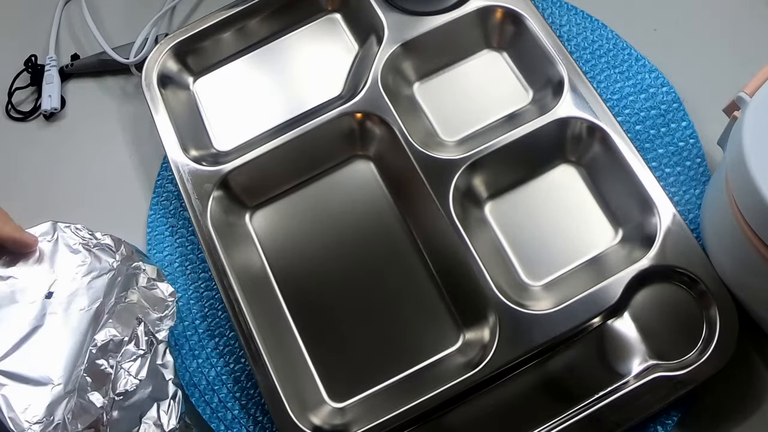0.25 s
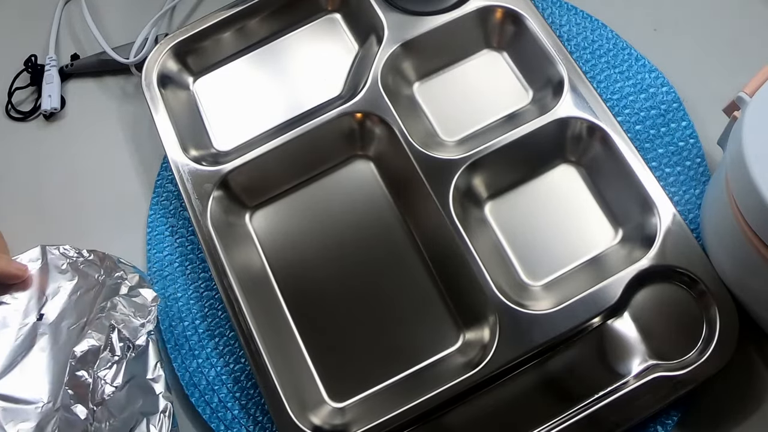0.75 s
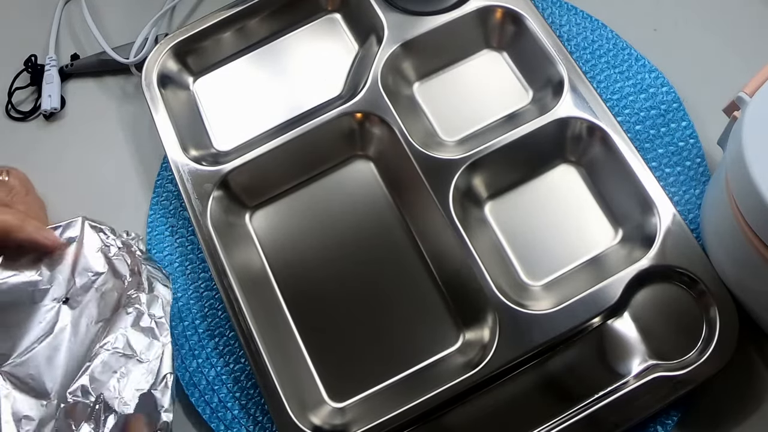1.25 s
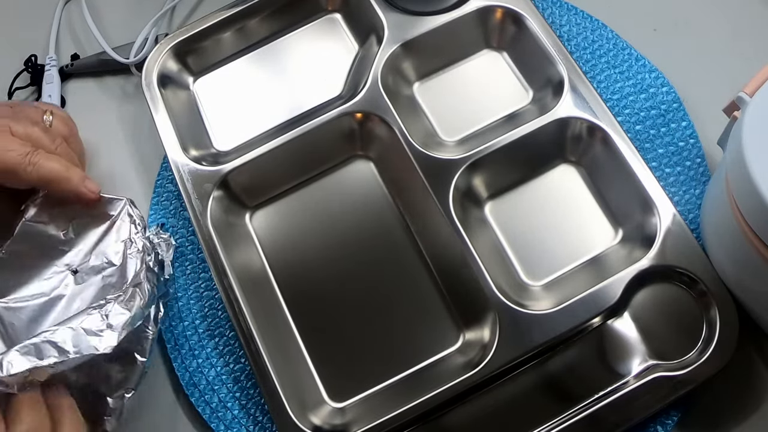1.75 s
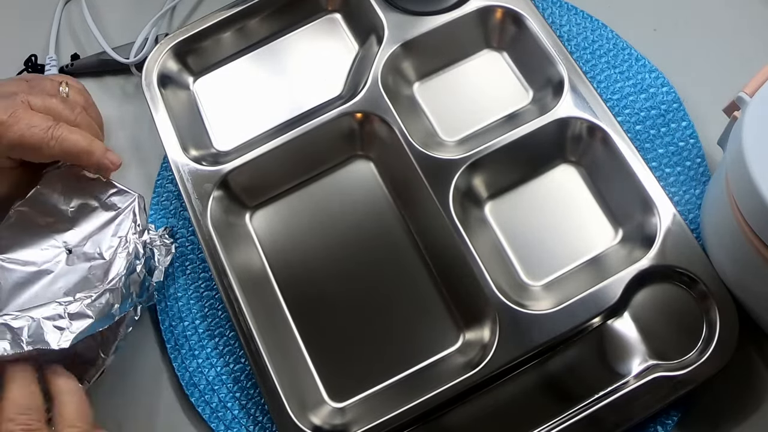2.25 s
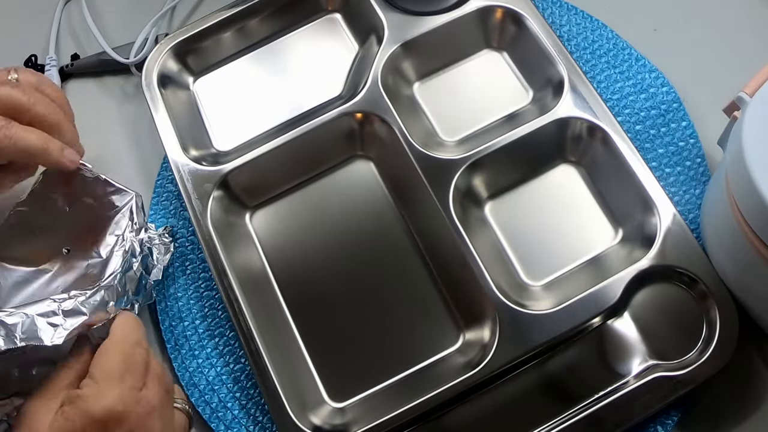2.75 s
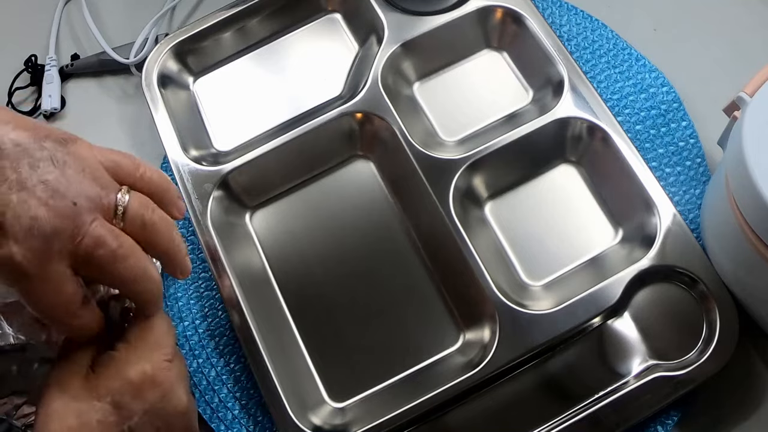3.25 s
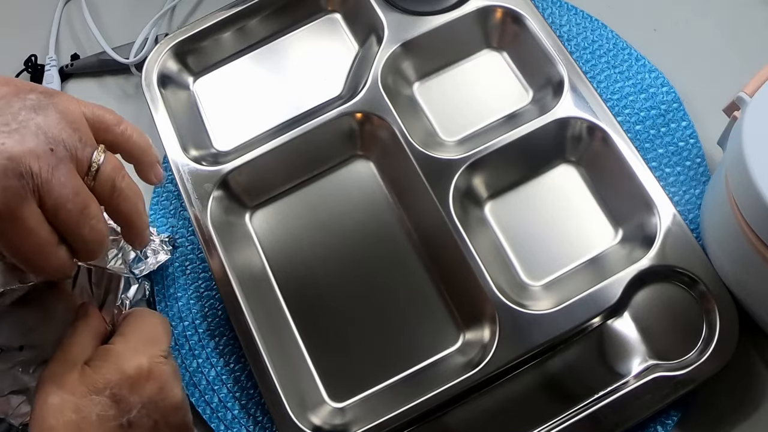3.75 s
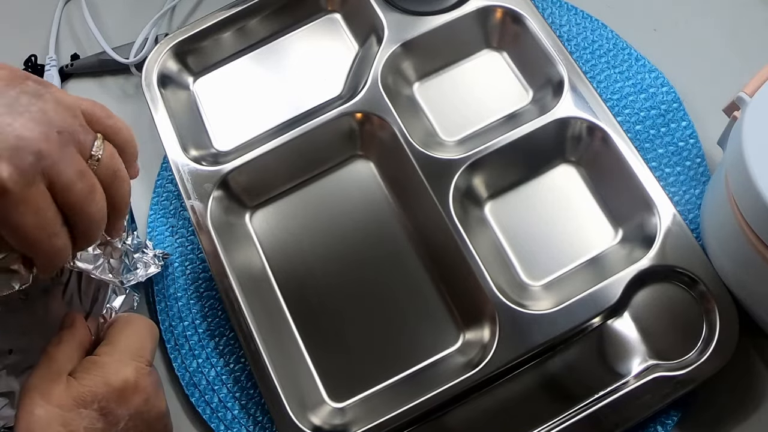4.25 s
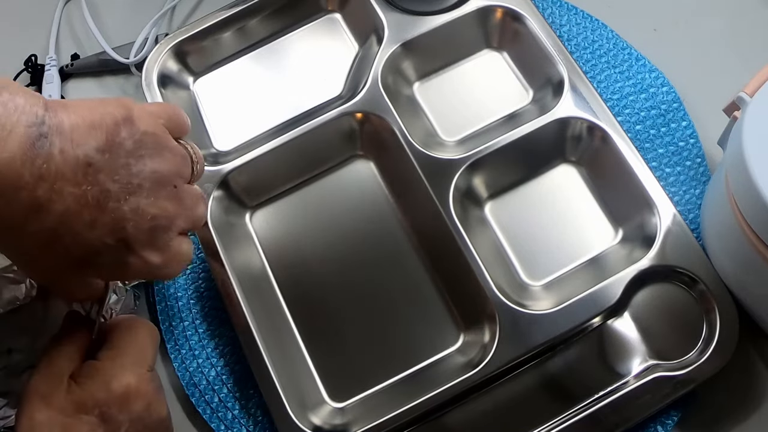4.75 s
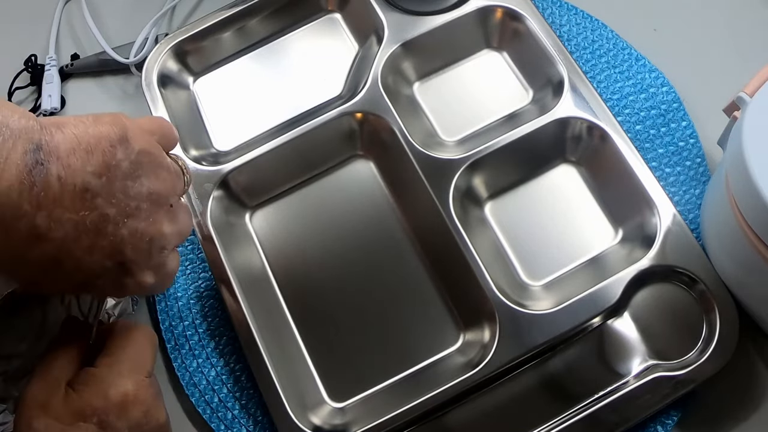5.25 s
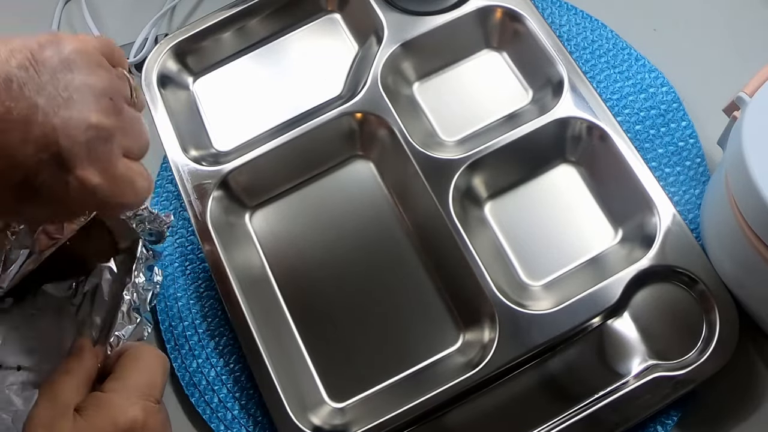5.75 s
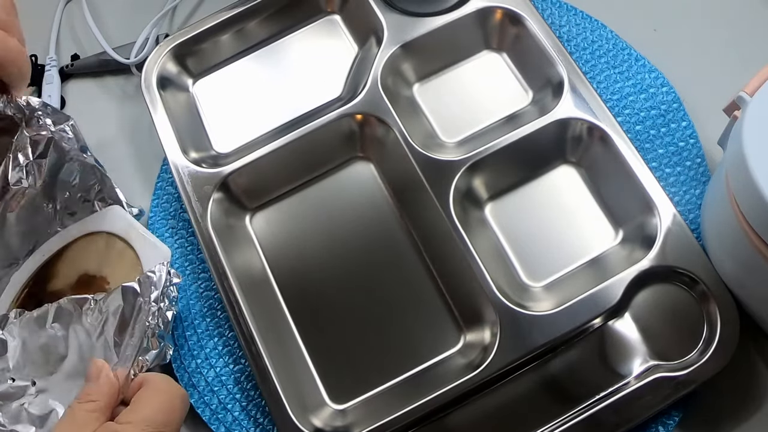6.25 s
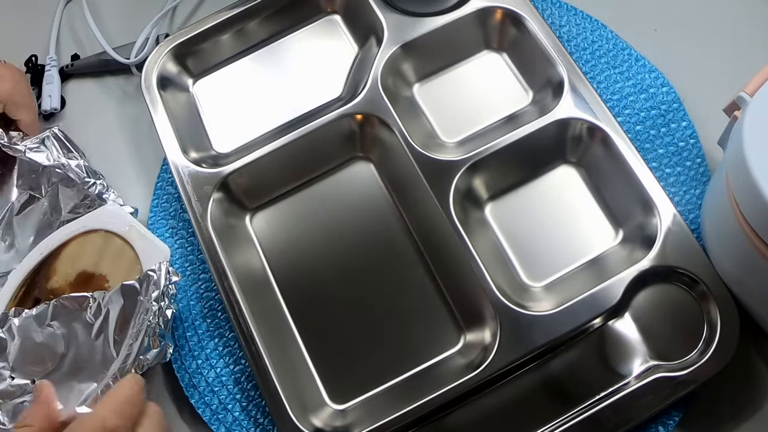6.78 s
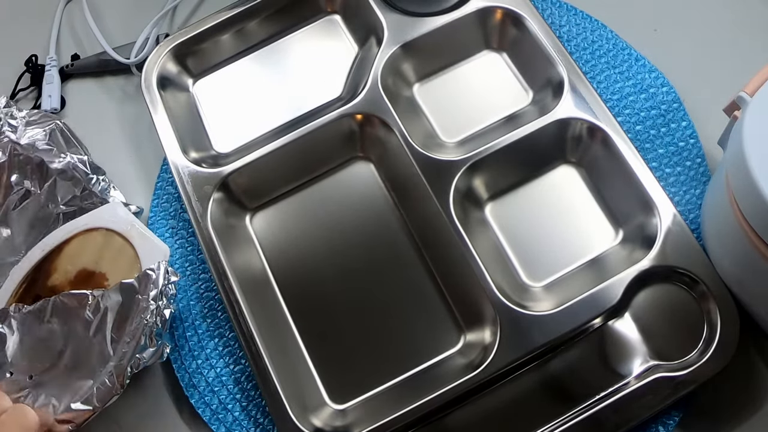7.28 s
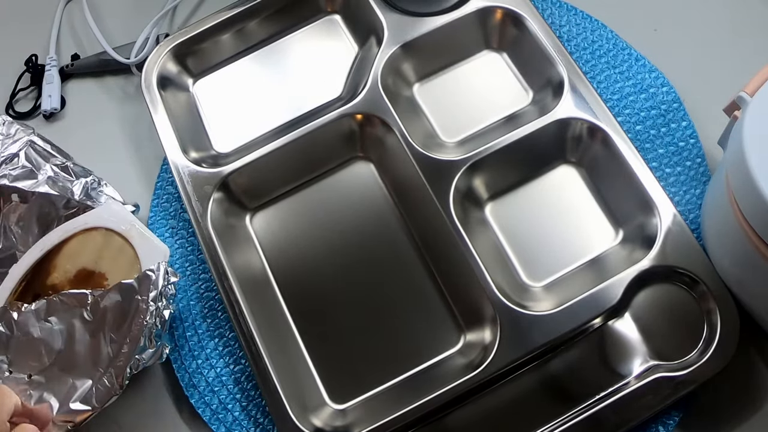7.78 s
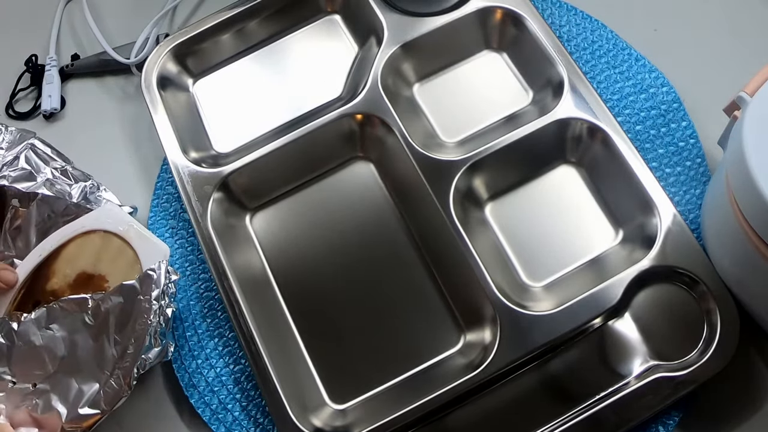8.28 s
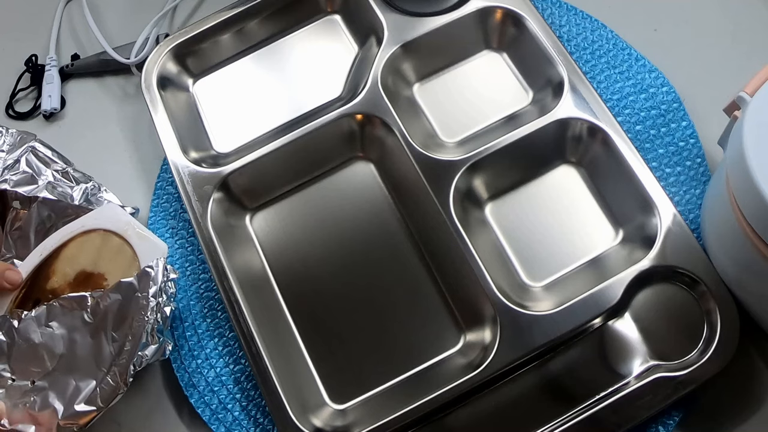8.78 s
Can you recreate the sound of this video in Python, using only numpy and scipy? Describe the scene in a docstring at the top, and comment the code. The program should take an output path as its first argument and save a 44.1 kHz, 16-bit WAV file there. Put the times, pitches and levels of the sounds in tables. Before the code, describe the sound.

Aluminium foil crinkles and crackles close up as it is peeled from a plastic tray, with sharp snaps, small squeaks and dull table knocks.

```python
"""Two hands peel aluminium foil off a plastic food tray on a table, close to a camera on a stand in a small room.
From the start noise-burst crinkle runs under single creases that crack and ring; squeaks and scrapes soon join in.
After 1 s the tray knocks on the table, heard as ringing table modes; near 2.7 s the hands almost let go.
The foil is worked hard again from 3.5 s, with the hardest snaps, knocks and stand sway around 5.8 to 6 s.
Lighter peeling follows to the end at 9 s; decaying-noise room sound, air and a faint hum lie under it all."""
import sys
import numpy as np
from scipy import signal
from scipy.fft import rfft, irfft, next_fast_len
from scipy.io import wavfile
from scipy.ndimage import uniform_filter1d, map_coordinates

SR = 44100
rng = np.random.default_rng(int(sys.argv[2]) if len(sys.argv) > 2 else 0)


def transcribe(signal):
    """Save signal, clipped to [-1, 1], as a 16-bit WAV file at the path in sys.argv[1]."""
    frames = np.atleast_2d(signal).T
    limited = np.clip(frames, -1, 1)
    pcm = np.round(limited * 32767).astype(np.int16)
    wavfile.write(sys.argv[1], SR, pcm)


N = 397782

# Table levels are relative: the function of each source may shift them all together.
# big creases that buckle: start_s, level_db, body_db (re level), treble_db (re level), facet_pitch_hz, t60_s
CREASE_SNAPS = [(.045, -31, -21, -8, 4950, 0.03), (0.076, -33, -23, -5, 2900, 0.15),
                (.144, -26, -13, -8, 2360, 0.06), (.158, -28, -18, 0, 1140, 0.067),
                (0.2226, -37, -14, -3, 1890, 0.028), (.259, -39, -9, -2, 2400, .025),
                (0.405, -40.5, -8, -2, 1280, 0.08), (.434, -35.5, -15, -0.5, 2450, 0.19),
                (.472, -37.5, -20, 0, 1280, 0.039), (0.523, -42.5, -14, 11, 4990, 0.022),
                (.538, -31, -15, -1, 1900, 0.13), (0.574, -32, -11, 6.5, 1330, 0.069),
                (0.6607, -40, -12, 3.5, 1800, 0.049), (.679, -42, -19, 11, 6650, 0.1),
                (0.697, -36, -26, -2.5, 1330, .03), (0.749, -31, -28, -4.5, 2920, 0.067),
                (0.774, -25, -21, -8, 1900, 0.17), (0.928, -37, -30, -3, 2280, 0.027),
                (0.951, -47.5, -20, 14.5, 8000, 0.045), (1.012, -38.5, -12, -4, 2900, 0.029),
                (1.027, -33, -14, 1, 2960, 0.038), (1.06, -23, -5, -0.5, 2280, 0.095),
                (1.091, -27, -14, 1, 3000, .03), (1.118, -23.5, -18, -3, 2600, 0.035),
                (1.144, -29, -16, -7, 3500, .022), (1.163, -31, -14, -5, 2800, .022),
                (1.183, -29, -13, -3, 2240, 0.055), (1.326, -34.5, -12, -15, 1160, 0.025),
                (1.379, -26.5, -20, -18, 1250, 0.043), (1.55, -31, -10, -6, 1230, 0.023),
                (1.562, -31, -16, -10, 1610, 0.029), (1.672, -29, -24, -9, 1290, 0.022),
                (1.714, -32, -21, -19, 1180, 0.12), (1.738, -23.5, -12, -14, 2430, 0.09),
                (1.757, -18.5, -19, -5, 4690, 0.032), (1.9064, -25.5, -6, -9, 2400, 0.035),
                (1.931, -26.5, -16, -12, 2250, .025), (1.954, -25.5, -20, -6, 2240, 0.035),
                (1.98, -29.5, -7.5, -5, 3840, 0.085), (2.001, -34, -12, 10.5, 2330, 0.08),
                (2.09, -31.5, -17, 6, 3810, 0.051), (2.128, -29, -18, 2, 2210, 0.067),
                (2.216, -29, -18, -6.5, 3320, 0.11), (2.259, -33, -20, -16, 2190, 0.025),
                (2.291, -34, -10, -1, 5000, .02), (2.332, -32, -13, -4, 4000, 0.04),
                (2.347, -33, 3.5, -14, 910, 0.03), (2.433, -40, -5, -11, 4600, 0.051),
                (2.463, -40, -6, -1, 5160, 0.061), (2.488, -41, -9, -8, 2790, 0.032),
                (2.538, -35.5, -11, -6.5, 4740, 0.078), (2.796, -39.5, -34, -15, 3500, 0.057),
                (2.814, -48, -24, -2.5, 2600, 0.091), (2.917, -42.5, -16, -1, 2500, 0.11),
                (2.953, -38.5, -4, -2.5, 2600, 0.13), (3.001, -27, -7, -3.5, 3980, 0.12),
                (3.015, -30, -10, -6, 2500, 0.072), (3.052, -31.5, -21, -6, 3420, 0.027),
                (3.111, -32, -4.5, -7, 1410, 0.058), (3.207, -37, -29, -1, 5700, 0.06),
                (3.2316, -46, -11, -2, 2940, 0.039), (3.3077, -33, -16, -6, 3640, 0.048),
                (3.374, -45, -9, 15, 6590, 0.05), (3.406, -34, -17, -2, 3600, .035),
                (3.413, -38, -16, 6, 1340, 0.027), (3.4405, -23.5, -32, -2.5, 5600, 0.025),
                (3.538, -32.5, -5.5, 0.5, 4360, 0.025), (3.558, -34.5, -13, -2, 1950, .05),
                (3.594, -33, -14, 0, 2500, 0.029), (3.613, -29, -14, -6, 1950, 0.11),
                (3.622, -27, -15, -12, 1940, .04), (3.683, -30, -12, -15, 1740, 0.027),
                (3.708, -26.5, -8, 1.5, 3000, 0.074), (3.744, -33, -15, -3, 1400, 0.027),
                (3.759, -33, -20, -6, 1720, 0.018), (3.778, -24, -12.5, -1, 3660, 0.067),
                (3.814, -28.5, -16, -3, 2370, .02), (3.823, -32.5, -18, -3, 3000, .018),
                (3.854, -31, -9, -4, 3770, 0.097), (3.869, -27.5, -19, -8, 2430, 0.045),
                (3.887, -37, -24, -1, 4440, .02), (3.942, -38, -24, 9, 3740, 0.013),
                (3.964, -24.5, -8, -0.5, 3500, 0.046), (3.969, -26.5, -9, 1, 3500, 0.04),
                (3.994, -38, -16, 5, 5000, .02), (4.0025, -24.5, -23, -4, 1940, 0.038),
                (4.02, -28, -12, 1, 5550, 0.027), (4.034, -28.5, -22, -6, 1820, 0.04),
                (4.052, -29, -29, 1.5, 3400, 0.025), (4.078, -36, -18, -2, 1400, 0.027),
                (4.137, -30.5, -1, -2, 1370, 0.032), (4.159, -34, -17, -1, 3600, .02),
                (4.182, -32, -19, 0, 8160, 0.022), (4.1911, -31.5, -14, 7, 3620, 0.028),
                (4.2031, -25.5, -21, -3, 3780, 0.039), (4.211, -22, -14, -8, 2400, 0.055),
                (4.241, -29, -13, -3, 4220, 0.043), (4.291, -31.5, -24, -18, 6500, 0.034),
                (4.379, -35.5, -18, -2, 1870, 0.042), (4.4104, -34.5, -29, -16, 3870, .03),
                (4.439, -30, -26, -24, 3800, 0.039), (4.496, -26.5, -14, -5, 4100, 0.08),
                (4.615, -31.5, -10, -2, 1270, 0.066), (4.658, -31.5, -10, -9, 4600, 0.099),
                (4.789, -32, -23, 0.5, 7000, 0.11), (4.806, -29, -33, -2, 1770, 0.11),
                (4.908, -42, -30, 7, 1370, 0.025), (4.948, -35, -23, -6.5, 1380, 0.11),
                (5.026, -36, -10.5, -2, 4390, 0.049), (5.0804, -28.5, -30, -2, 3400, 0.039),
                (5.103, -29.5, -20, -4, 2260, 0.06), (5.11, -30, -18, -3, 2390, 0.083),
                (5.187, -43, -20, -8, 3000, .02), (5.201, -34, -7, -7, 3000, 0.061),
                (5.21, -29.5, -10.5, -5, 4770, 0.058), (5.217, -33, -8.5, -1, 3500, 0.045),
                (5.244, -39, -14, -1, 2600, .025), (5.269, -39, -22, 4, 3530, .037),
                (5.3134, -30.5, -30, -1, 1490, 0.026), (5.321, -35, -30, 4, 4300, 0.029),
                (5.339, -39, -27, 15, 3880, 0.027), (5.3896, -24.5, -24, -6, 3400, 0.037),
                (5.44, -27, -18, -6.5, 1410, 0.034), (5.516, -24.5, -28, -4.5, 1390, 0.038),
                (5.549, -31, -26, -11, 1360, 0.076), (5.567, -30, -8.5, 0.5, 4900, 0.07),
                (5.599, -31.5, -13, -3, 2350, 0.022), (5.62, -35, -17, -4, 1340, .02),
                (5.635, -30, -22, -7, 1490, .02), (5.6455, -29, -25, 0, 3620, 0.018),
                (5.6603, -22.5, -32, 1, 1400, 0.044), (5.679, -27.5, -29, 4, 1370, 0.024),
                (5.687, -22, -19, 0.5, 1380, 0.095), (5.712, -28, -24, -7, 2400, .025),
                (5.755, -25.5, -9.5, -4, 1120, 0.035), (5.771, -28.5, -22, -3, 3570, .025),
                (5.798, -26, -13, -8, 2800, .08), (5.8126, -16.5, -25, -7, 3600, 0.022),
                (5.8213, -18.5, -8, -6.5, 2650, 0.053), (5.83, -23, -15, -2, 3000, .02),
                (5.8404, -20.5, -8, -2, 2400, 0.019), (5.8443, -17, -22, -7, 1340, 0.031),
                (5.851, -18, -7.5, -10, 2730, 0.035), (5.873, -25, -12, -7, 1400, .02),
                (5.879, -31, -12, -2, 2600, 0.023), (5.906, -32, -10, -7, 3600, 0.017),
                (5.94, -24, -10, -11, 2400, .018), (5.9469, -20.5, -6, -5, 2750, 0.034),
                (5.96, -18.5, -15, -7, 2280, 0.022), (5.9685, -24, -12, -6, 2550, 0.025),
                (5.977, -26, -14, -6, 2500, .02), (6.0064, -17, -8, -8, 2700, 0.037),
                (6.019, -29, -6, -5, 3470, 0.026), (6.068, -28, -26, -11, 885, 0.083),
                (6.136, -36.5, -16, -1, 3000, 0.017), (6.186, -33, -7, 1, 3550, 0.03),
                (6.209, -32, -26, -5, 3610, 0.022), (6.22, -34, -16, -2, 4220, 0.031),
                (6.252, -36, -11, -8, 3000, .025), (6.277, -33, -27, -2.5, 2920, 0.05),
                (6.288, -36, -20, 0, 4500, 0.032), (6.3014, -37, -21, -2, 1910, 0.035),
                (6.353, -26.5, -16, -9, 3320, 0.035), (6.388, -41, -18, 1, 5000, .025),
                (6.416, -38, -17, -13, 2710, .02), (6.431, -32, -7.5, -4, 2130, 0.098),
                (6.506, -38, -13, -14, 3020, 0.03), (6.516, -35.5, -12, -7, 4890, .025),
                (6.546, -43, -18, -8, 4500, 0.018), (6.573, -31.5, -8, -9, 3440, 0.04),
                (6.62, -31, -11, 0.5, 3680, 0.086), (6.651, -34.5, -16, -5, 1600, 0.025),
                (6.699, -38, -12, -13, 2490, 0.026), (6.715, -36, -22, -11, 2580, .025),
                (6.724, -31.5, -13, -6, 2900, 0.04), (6.735, -35, -16, -5, 2300, .02),
                (6.751, -42, -21, 12, 3850, 0.15), (6.823, -31, -7, -4, 5170, 0.084),
                (6.838, -27.5, -15, -0.5, 5160, 0.059), (6.866, -28, -13, -12, 2000, 0.062),
                (6.883, -22, -19, -11, 4940, 0.088), (7.069, -36, -15, -6, 5860, 0.094),
                (7.105, -39.5, -15, 4, 6480, 0.045), (7.162, -28, -13, -7, 5500, 0.08),
                (7.21, -30.5, -17, -17, 3480, 0.058), (7.24, -38, -22, 5, 4600, 0.033),
                (7.255, -32, -23, 4.5, 5630, 0.15), (7.3005, -24, -28, -5, 4370, 0.017),
                (7.39, -38.5, -30, -10.5, 2450, 0.018), (7.401, -39, -34, -10, 2140, 0.03),
                (7.493, -43.5, -15, 12.5, 5150, 0.066), (7.5847, -39, -9, -5, 2450, 0.028),
                (7.602, -39.5, -17, 7, 5840, 0.031), (7.67, -30.5, -17, -7, 1860, 0.039),
                (7.711, -26, -18, 1, 3360, 0.068), (7.753, -29, -5, 0, 1950, 0.029),
                (7.781, -27, -1.5, -1, 1830, 0.11), (7.8284, -33, -2.5, -5, 3740, .03),
                (7.845, -32, -17, -7, 1830, .025), (7.892, -26.5, -11.5, 4, 1850, 0.049),
                (7.938, -31, -10, -8, 3430, 0.091), (8.015, -21, -18, -3.5, 6800, 0.054),
                (8.079, -37.5, -15, -3, 3380, 0.055), (8.129, -38, -22, -20, 3530, 0.066),
                (8.18, -36, -26, -8, 3740, .025), (8.2, -33.5, -20, 1.5, 3270, 0.067),
                (8.238, -32, -31, -3, 3050, 0.067), (8.265, -40.5, -20, 7.5, 6400, 0.042),
                (8.35, -37.5, -26, 7, 2980, 0.058), (8.394, -30.5, -11, -1, 4080, 0.097),
                (8.426, -31.5, -5.5, -2, 1110, 0.12), (8.552, -25, -5.5, -5.5, 4470, 0.033),
                (8.559, -31.5, -12, -12, 1080, 0.037), (8.664, -35.5, -31, -0.5, 4840, 0.037),
                (8.675, -44, -25, 8, 5200, 0.065), (8.691, -32, -14, -13, 2180, 0.053),
                (8.733, -38, -23, -7, 3210, 0.026), (8.965, -35.5, -6.5, -10, 1280, 0.063),
                (8.981, -36, -10.5, -5, 6950, 0.12)]
# taut facets that pop through and ring on one pitch: start_s, peak_db, pitch_hz, t60_s
FACET_PINGS = [(0.9275, -23.5, 2354, 0.023), (2.816, -44, 1310, 0.031), (3.6167, -29, 1950, .05),
               (3.6837, -27, 1800, .02), (4.0035, -19, 1940, .02), (4.036, -28, 1880, .02),
               (4.053, -23, 1870, .018), (4.286, -34, 1880, .02), (5.516, -31, 1400, .02),
               (5.6885, -24, 1350, .03), (5.9487, -19, 2820, .012), (8.6926, -30, 2110, .016)]
# spectrum of the foil: frequency_hz, level_db (per Hz)
FOIL_SPECTRUM = [(120, -17.5), (250, -8), (400, -11.5), (560, -7), (1050, -3.5), (1320, 2), (1650, 1.5),
                 (2400, 3.5), (3500, 2), (6000, -0.5), (8800, -2.5), (10500, -13.5), (13000, -30.5),
                 (15000, -39)]
# how firmly the hands hold the foil: time_s, crinkle_db
HAND_GRIP = [(0, -47), (.38, -51.5), (1.3, -48), (2.35, -50.5), (2.6, -58.5), (2.755, -81), (2.785, -56),
             (2.9, -60), (3.29, -56), (3.5, -42), (4.6, -50), (5.4, -52), (6.2, -49.5), (7.02, -51),
             (7.5, -51), (8.3, -50), (8.78, -52), (9.02, -52.5)]
# fingers pull or press the foil: start_s, length_s, crinkle_db, body_db (re crinkle), treble_db (re crinkle)
FOIL_PULLS = [(0, 0.015, -42.5, -14, 2), (0.153, 0.083, -46, -5.5, -3), (0.304, 0.054, -44, -17, -28),
              (0.537, 0.078, -43.5, -6, -1), (0.727, 0.15, -40, -14, -5), (1.077, 0.071, -35, -20, -9),
              (1.177, 0.32, -41, -4, -11), (1.324, 0.14, -35.5, -7, -32), (1.484, 0.15, -39, -4, -16),
              (1.688, 0.2, -34, -10, -16), (1.906, 0.086, -31, -18.5, -12), (2.012, 0.25, -42, -5.5, -6),
              (2.297, 0.1, -46.5, -1.5, -23), (3.028, 0.1, -44.5, -5, -10), (3.408, 0.071, -50, -6, 1),
              (3.546, 0.099, -42, -15, -2.5), (3.658, 0.15, -43, -14, -9), (3.87, 0.048, -44.5, -11, -2.5),
              (3.986, 0.11, -47, -5, 4.5), (4.154, 0.083, -43, -6, -1), (4.447, 0.052, -40.5, -21, -5.5),
              (4.643, 0.051, -43.5, -19, -1.5), (5.117, 0.18, -53.5, -14, 1),
              (5.372, 0.13, -46.5, -32, -5.5), (5.544, 0.14, -41.5, -11, -8.5),
              (5.67, 0.18, -38.5, -12, -6), (5.823, 0.065, -32, -10, -6), (5.933, 0.051, -30.5, -6.5, -9),
              (6.027, 0.043, -41, 0.5, -1), (6.202, 0.17, -44, -9.5, -10), (6.724, 0.052, -48.5, -7, -11),
              (6.867, 0.049, -48, -3, -1), (7.21, 0.064, -45, -8, -2.5), (7.628, 0.019, -45, -26, 0.5),
              (7.696, 0.095, -38.5, -6, -2.5), (7.798, 0.13, -43, -8.5, -5), (8.017, 0.052, -47, -7, 2.5),
              (8.293, 0.18, -44, -10, -17), (8.57, 0.076, -51.5, -8.5, -17)]
# where the foil is worked: time_s, left_re_right_db
FOIL_PLACE = [(0.0, 1.5), (0.43, 3.5), (2.11, 0), (2.36, 3), (6.03, 1.5), (6.51, 4), (6.96, 1.5),
              (7.06, 6.5), (7.13, 2.5), (9.02, 3.5)]
# foil squeaking or the tray sliding on the table: start_s, length_s, pitch_hz, line_width_hz, level_db
SLIDES = [(0.285, 0.16, 1297, 50, -52.5), (0.47, 0.15, 1337, 55, -52), (0.577, 0.019, 1326, 60, -38.5),
          (1.299, 0.26, 1258, 71, -38.5), (1.331, 0.25, 685, 69.5, -49), (1.5, 0.21, 1217, 60, -46.5),
          (1.684, 0.051, 1245, 65, -38.5), (1.807, 0.23, 1340, 60, -49), (1.76, 0.32, 2330, 200, -44),
          (2.371, 0.03, 2650, 60, -42), (2.324, 0.025, 2910, 60, -42), (2.383, 0.086, 2820, 110, -51),
          (2.45, .09, 2900, 100, -54), (2.483, 0.3, 380, 80.4, -69), (2.874, 0.24, 242, 69, -61),
          (3.603, .03, 1934, 60, -42), (3.994, 0.099, 1890, 60, -52), (4.478, 0.057, 425, 70, -53.5),
          (4.58, 0.27, 438, 91, -67), (5.663, 0.085, 1363, 75, -38.5), (6.063, 0.025, 922, 50, -42.5),
          (7.714, 0.019, 3170, 280, -27.5)]
# hollow modes of the plastic tray: pitch_hz, level_db
TRAY_MODES = [(230, 2.5), (430, 6), (640, 14.5), (830, -20)]
# the tray knocks on the table: start_s, peak_db
TRAY_KNOCKS = [(1.058, -38), (1.112, -51), (2.334, -43), (4.137, -55), (4.608, -64), (5.231, -50),
               (5.849, -47), (5.94, -33), (6.006, -35), (7.675, -45), (7.704, -34.5), (8.967, -45.5)]
# modes of the table top: pitch_hz, level_db, t60_s
TABLE_MODES = [(60, 4.5, 0.048), (86, -0.5, 0.18), (121, 2, 0.15), (169.6, -4.5, 0.12), (255, -0.5, 0.085),
               (361, -17, 0.18), (492, -5, 0.038)]
# the hands push the tray about on the table: start_s, length_s, stand_sway_db, table_thud_db
TRAY_PUSHES = [(0.197, 0.08, -52.5, -55.5), (0.573, 0.35, -70, -67), (1.092, 0.057, -47, -35.5),
               (1.226, 0.15, -49.5, -45.5), (1.505, 0.21, -59, -55.5), (1.8, .48, -75, -61),
               (2.313, 0.025, -69, -54), (3.05, 0.087, -63, -60.5), (3.45, 0.21, -69, -72),
               (3.983, 0.042, -57, -54), (4.577, 0.073, -56.5, -57.5), (5.14, 0.16, -51, -62),
               (5.567, 0.064, -69, -61), (5.86, 0.073, -41, -43.5), (5.982, 0.11, -35.5, -40),
               (6.16, 0.12, -55, -60), (6.74, 0.21, -55.5, -55.5), (7.043, 0.11, -63, -56.5),
               (7.716, 0.11, -64, -44.5), (7.804, 0.27, -57, -64), (8.69, 0.024, -66, -55)]
# stereo width: frequency_hz, side_re_mid_db
STEREO_WIDTH = [(30, 10), (55, -3.5), (85, -4), (120, -3), (250, -6.5), (600, -5), (1280, -3), (2350, -6),
                (4330, -8), (8000, 1), (14700, 0.5)]
# decay of the room: frequency_hz, t60_s
ROOM_DECAY = [(150, 0.2), (1000, 0.3), (4000, 0.15), (8000, 0.21), (14000, 0.64)]
# spectrum of the room air: frequency_hz, level_db (per Hz)
AIR_SPECTRUM = [(40, 8), (120, -13), (400, -1), (700, -6), (3000, -5), (8000, -29), (14000, -55)]
# lines of the appliance hum: pitch_hz, line_width_hz, level_db
HUM_LINES = [(57.6, 1.3, -70), (176.2, 23.6, -68.5)]

GRIP_BODY_DB, GRIP_TREBLE_DB = -13.5, -7.5  # colour of the held foil, re its crinkle
PULL_RISE_S, PULL_RELEASE_DB_PER_S = 0.046, 307
PUSH_RISE_S, SWAY_RELEASE_DB_PER_S, THUD_RELEASE_DB_PER_S = 0.041, 129, 223
REST_SWAY_DB, REST_THUD_DB = -94, -74  # hands resting on the tray
# ring re crack: strongest at the reference pitch, weaker to either side
FACET_DB, FACET_REF_HZ, FACET_DB_PER_OCTAVE = -1, 1710, -2
TOP_HZ = 14800  # highest frequency kept


def snaps(level_db=3, facet_q=12, flip_s=0.0014, unzip_per_s=0.51, sharp=1.09, sharp_t60_s=0.015):
    """A crease flips: a sharp crack, then an uneven flutter runs through the sheet and its facet rings."""
    t = np.arange(4096) / SR
    hz = np.fft.rfftfreq(len(t), 1 / SR)
    bands, width = registers(hz), amp(along(STEREO_WIDTH, hz))
    out = np.zeros((2, N + len(t)))
    for start_s, db, body_db, treble_db, facet_hz, t60_s in list(CREASE_SNAPS) + small_snaps():
        patch = bands * ripple(hz, depth_db=4.0, spacing_hz=229.4)
        colours = np.vstack([patch, resonance(hz, facet_hz, facet_hz / facet_q)])
        mid, side = rfft(rng.standard_normal((2, len(colours), len(t)))) * colours

        crack = (1 - np.exp(-t / flip_s)) * amp(-60 * t / sharp_t60_s)
        # long creases take a moment to unzip
        unzip = 1 - np.exp(-t / (flip_s + unzip_per_s * t60_s ** 2))
        flutter = unzip * amp(-60 * t / t60_s) * spurts(len(t), depth_db=2.0, per_second=310)
        fade = (flutter + sharp * crack) / np.hypot(1, sharp)

        left_right = np.stack([mid + width * side, mid - width * side], axis=1)
        bursts = irfft(left_right) * fade
        fade_rms = np.sqrt(np.mean(fade ** 2))
        body, middle, treble, facet = (unit(burst) * fade_rms for burst in bursts)

        # the facet takes its share of the crack's energy
        octaves_off = abs(np.log2(facet_hz / FACET_REF_HZ))
        ring = amp(FACET_DB + FACET_DB_PER_OCTAVE * octaves_off)
        snap = (middle + ring * facet) / np.hypot(1, ring)
        snap = snap + amp(body_db) * body + amp(treble_db) * treble
        out[:, max(round(start_s * SR), 0):][:, :len(t)] += amp(db + level_db) * snap
    return out[:, :N]


def small_snaps(count=150, facet_hz=2800, facet_octaves=0.7):
    """Lesser creases give way at scattered times, following the crinkle gain; rows as in CREASE_SNAPS."""
    at = ((np.arange(count) + rng.random(count)) * N / count).astype(int)
    levels_db = 20 * np.log10(strain()[1][at])
    pitches_hz = facet_hz * 2 ** (facet_octaves * rng.standard_normal(count))
    # body -15 dB, treble -4 dB, t60 0.019 s
    return [(i / SR, db, -15, -4, pitch_hz, 0.019) for i, db, pitch_hz in zip(at, levels_db, pitches_hz)]


def pings(attack_s=0.00091, hold_s=0.0023, waver_hz=40):
    """A popped facet rings on a wavering pitch: it holds briefly, then dies away."""
    t = np.arange(SR // 12) / SR
    out = np.zeros((2, N))
    for start_s, db, pitch_hz, t60_s in FACET_PINGS:
        steps = rng.standard_normal((2, len(t)))
        drift = np.sqrt(2 * np.pi * waver_hz / SR) * np.cumsum(steps, axis=1)
        tone = np.sin(2 * np.pi * pitch_hz * t + drift) * (1 - np.exp(-t / attack_s))
        decay = amp(db - 60 * np.maximum(t - hold_s, 0) / t60_s)
        out[:, round(start_s * SR):][:, :len(t)] += decay * tone
    return out


def crinkle(body_db=-3.5, middle_db=-3.5, treble_db=-2.0, own_db=-2.5):
    """Hundreds of tiny creases give way each second, some in every register, others only in their own."""
    shared = ticks(per_second=300, spread_db=1.0, cap_db=9.0, life_s=0.0057)
    gains = np.array(strain()) * amp([[body_db], [middle_db], [treble_db]])
    out = np.zeros((2, N))
    for k, gain in enumerate(gains):
        own = ticks(per_second=260, spread_db=2.5, cap_db=7.5, life_s=0.00091)
        out += gain * stereo(shared + amp(own_db) * own, lambda hz: registers(hz)[k])
    return recrumple(out, depth_db=2.0)


def strain():
    """How hard the foil is worked, as gains of sheet body, crinkle and treble: the grip plus the pulls."""
    grip_db, = curves(HAND_GRIP)
    starts, lengths, crinkle_db, body_db, treble_db = np.transpose(FOIL_PULLS)
    gains = []
    for held_db, pulled_db in [(GRIP_BODY_DB, body_db), (0, 0), (GRIP_TREBLE_DB, treble_db)]:
        pulls = gestures(starts, lengths, crinkle_db + pulled_db, PULL_RISE_S, PULL_RELEASE_DB_PER_S)
        gains.append(np.hypot(amp(grip_db + held_db), pulls))
    return gains


def registers(hz, body_hz=900, treble_hz=4500):
    """The foil's colour split by frequency into sheet body, crinkle and treble."""
    low = 1 / (1 + (hz / body_hz) ** 6)
    high = 1 - 1 / (1 + (hz / treble_hz) ** 6)
    return amp(along(FOIL_SPECTRUM, hz)) * np.sqrt(np.abs([low, 1 - low - high, high]))


def ripple(hz, depth_db, spacing_hz):
    """Random peaks and dips: the modes of one crumpled patch of foil."""
    heights = rng.standard_normal(size=400)
    return amp(depth_db * map_coordinates(heights, [hz / spacing_hz], mode="wrap"))


def recrumple(x, depth_db):
    """The sheet keeps changing shape, so its resonances come and go."""
    z = signal.stft(x, nperseg=256)[2]
    field = uniform_filter1d(rng.standard_normal(z.shape[1:]), size=2, axis=0)  # across frequency
    field = uniform_filter1d(field, size=7, axis=1)  # across time
    return signal.istft(z * unit(amp(depth_db * unit(field))), nperseg=256)[1][:, :N]


def scrapes(slip_db=2.5, slips_per_s=75, grit_db=-9, grit_spread=3):
    """A sliding surface sticks and slips, squeaking in uneven, gritty spurts."""
    out = np.zeros((2, N))
    for start_s, length_s, pitch_hz, width_hz, db in SLIDES:
        n = round(length_s * SR)
        grit = stereo(rng.standard_normal((2, n)), lambda hz: resonance(hz, pitch_hz, grit_spread * width_hz))
        squeak = (wavering(n, pitch_hz, width_hz) + amp(grit_db) * grit) / np.hypot(1, amp(grit_db))
        envelope = spurts(n, slip_db, slips_per_s) * signal.windows.tukey(n, .5)
        out[:, round(start_s * SR):][:, :n] += amp(db) * squeak * envelope
    return out


def taps(count=70, level_db=-15, t60_s=0.063, attack_s=0.0022):
    """Fingers bump the hollow tray lightly at random, ringing its modes harder the firmer the grip."""
    t = np.arange(SR // 10) / SR
    grip_db, = curves(HAND_GRIP)
    out = np.zeros(N + len(t))
    for at in rng.integers(0, N, count):
        ring = np.zeros(len(t))
        for mode_hz, mode_db in TRAY_MODES:
            pitch_hz = mode_hz * rng.normal(1, 0.072)
            ring += amp(mode_db) * np.sin(2 * np.pi * (pitch_hz * t + rng.random()))
        decay = amp(grip_db[at] + level_db - 60 * t / t60_s)
        out[at:at + len(t)] += decay * ring * (1 - np.exp(-t / attack_s))
    return out[:N]


def knocks(level_db=-3, attack_s=0.0038):
    """Each knock, cushioned by the foil, rings the table top modes at new strengths."""
    t = np.arange(SR // 3) / SR
    out = np.zeros(N + len(t))
    for start_s, db in TRAY_KNOCKS:
        ring = np.zeros(len(t))
        for mode_hz, mode_db, t60_s in TABLE_MODES:
            decay = amp(mode_db + rng.normal(0, 3.9) - 60 * t / t60_s)
            ring += decay * np.sin(2 * np.pi * (mode_hz * t + rng.random()))
        out[round(start_s * SR):][:len(t)] += amp(db + level_db) * ring * (1 - np.exp(-t / attack_s))
    return out[:N]


def jolts(sway_db=-1, thud_db=-4, width_hz=30, soft_hz=65):
    """Each push thuds in the table top and sets the camera stand swaying at its own pitch."""
    starts, lengths, sways_db, thuds_db = np.transpose(TRAY_PUSHES)
    sway = gestures(starts, lengths, sways_db + sway_db, PUSH_RISE_S, SWAY_RELEASE_DB_PER_S)
    thud = gestures(starts, lengths, thuds_db + thud_db, PUSH_RISE_S, THUD_RELEASE_DB_PER_S)
    sway, thud = sway + amp(REST_SWAY_DB), thud + amp(REST_THUD_DB)

    def table(hz):
        """The table top modes, softened above soft_hz."""
        modes = sum(amp(db) * resonance(hz, mode_hz, width_hz) for mode_hz, db, _ in TABLE_MODES)
        return modes / np.hypot(1, hz / soft_hz)

    # the negative spread makes most bumps strong and a few weak
    bumps = ticks(per_second=86, spread_db=-1.0, cap_db=14, life_s=0.0074)
    return sway * wavering(N, pitch_hz=28.4, width_hz=5.07) + thud * stereo(bumps, table)


def room(x, build_s=0.005, count=24):
    """The room's answer: decaying noise tails, drawn anew for each of count stretches of time."""
    out, step = np.zeros((2, N + SR)), N // count + 1
    for start in range(0, N, step):
        hz, t, z = signal.stft(rng.standard_normal((2, SR // 2)), SR, nperseg=256)
        decay = amp(-60 * t / along(ROOM_DECAY, hz)[:, None]) * (1 - np.exp(-t / build_s))
        tail = signal.istft(z * decay, SR, nperseg=256)[1]
        tail = tail / np.linalg.norm(tail[0])
        wet = signal.fftconvolve(x.mean(0)[None, start:start + step], tail, axes=1)
        out[:, start:start + wet.shape[1]] += wet
    return np.std(out[0, :N]) * stereo(out[:, :N], np.ones_like)


def background(air_db=-72):
    """Quiet room air as steady noise, and an appliance's wavering hum."""
    hum = sum(amp(db) * wavering(N, pitch_hz, width_hz) for pitch_hz, width_hz, db in HUM_LINES)
    return hum + amp(air_db) * noise(AIR_SPECTRUM)


def gestures(starts, lengths, levels_db, rise_s, release_db_per_s):
    """Gain of overlapping hand movements: each swells up to its start, holds and dies away."""
    t = np.arange(0, N, 64) / SR
    since = t - starts[:, None]
    swell = np.clip(1 + since / rise_s, 0, 1)
    gain = swell * amp(levels_db[:, None] - release_db_per_s * np.maximum(since - lengths[:, None], 0))
    return np.interp(np.arange(N) / SR, t, np.linalg.norm(gain, axis=0))


def ticks(per_second, spread_db, cap_db, life_s):
    """Two channels of tiny noise bursts at random times, their sizes spread exponentially in dB."""
    count = int(per_second * N / SR)
    at = rng.integers(0, N, count)
    size = amp(np.minimum(spread_db * rng.exponential(size=count), cap_db))
    power = signal.lfilter([1], [1, -np.exp(-1 / (life_s * SR))], np.bincount(at, size ** 2, N))
    return unit(np.sqrt(power) * rng.standard_normal((2, N)))


def spurts(n, depth_db, per_second):
    """An uneven gain of rms 1 that jumps about so many times a second."""
    heights = rng.standard_normal(size=99)
    jumps = map_coordinates(heights, [np.arange(n) * per_second / SR], mode="wrap")
    return unit(amp(depth_db * jumps))


def wavering(n, pitch_hz, width_hz, skirt=4.9):
    """A stereo tone whose unsteady pitch smears it into a narrow band."""
    drift = np.sqrt(2 * np.pi * width_hz / SR) * rng.standard_normal((2, n))
    phase = np.cumsum(2 * np.pi * pitch_hz / SR + drift, axis=1)
    return stereo(np.sin(phase), lambda hz: resonance(hz, pitch_hz, skirt * width_hz))


def resonance(hz, centre_hz, width_hz):
    """A peak with steep skirts, about width_hz wide 3 dB down."""
    return 1 / (1 + ((hz - centre_hz) / width_hz * 1.3) ** 2)


def noise(spectrum):
    """Steady stereo noise with a given spectrum."""
    return stereo(rng.standard_normal((2, N)), lambda hz: amp(along(spectrum, hz)))


def stereo(pair, colour):
    """Two signals, as mid and side, become coloured left and right, with a mid of rms 1."""
    def response(hz):
        """The colour for the mid, and the colour times the stereo width for the side."""
        return colour(hz) * np.array([np.ones_like(hz), amp(along(STEREO_WIDTH, hz))])

    mid, side = filtered(pair, response)
    return np.array([mid + side, mid - side]) / (np.std(mid) + 1e-12)


def filtered(x, response):
    """x times a response of frequency."""
    n = x.shape[-1]
    m = next_fast_len(n + n // 8, True)
    return irfft(rfft(x, m) * response(np.fft.rfftfreq(m, 1 / SR)), m)[..., :n]


def along(points, hz):
    """(Hz, value) points read on a log frequency axis."""
    f, v = np.transpose(points)
    return np.interp(np.log(hz + 1), np.log(f + 1), v)


def curves(rows):
    """One value per sample for each column after the time."""
    s, *cols = np.transpose(rows)
    return [np.interp(np.arange(N) / SR, s, c) for c in cols]


def amp(db):
    """Decibels to gain."""
    return 10 ** (np.asarray(db) / 20)


def unit(x):
    """Scale to rms 1."""
    return x / np.sqrt(np.mean(x ** 2) + 1e-20)


def scene(room_db=-5.0):
    """The foil lies a little to the left and shifts as the hands turn it; room, table and air surround it."""
    left_re_right_db, = curves(FOIL_PLACE)
    pan = amp(np.outer([.5, -.5], left_re_right_db))
    foil = (snaps() + pings() + crinkle() + scrapes() + taps()) * pan
    return foil + amp(room_db) * room(foil) + knocks() + jolts() + background()


def record(dry):
    """Nothing sounds above TOP_HZ."""
    return filtered(dry, lambda hz: hz < TOP_HZ)


dry = scene()
out = record(dry)
transcribe(out)
```